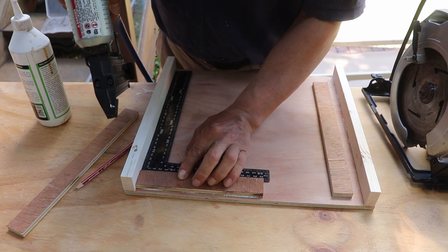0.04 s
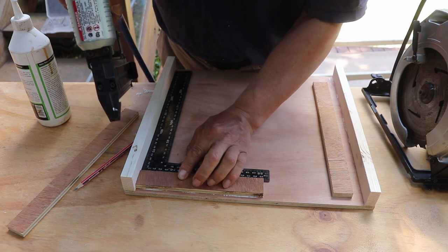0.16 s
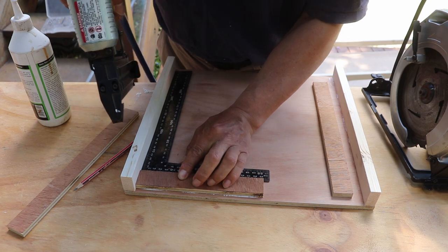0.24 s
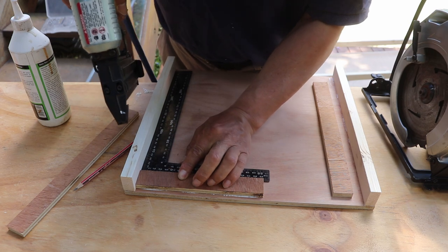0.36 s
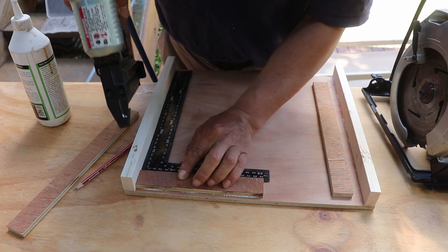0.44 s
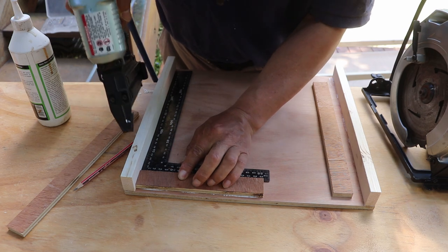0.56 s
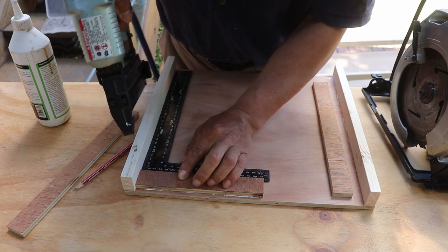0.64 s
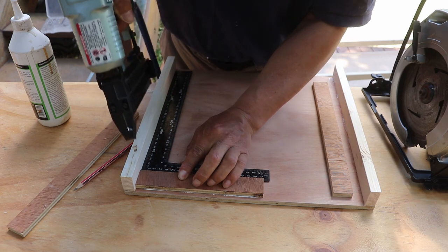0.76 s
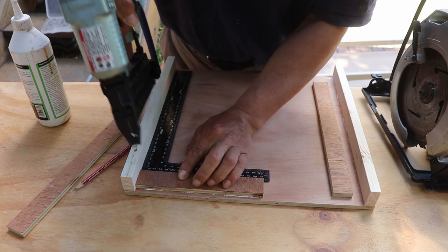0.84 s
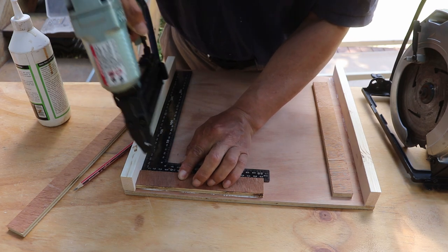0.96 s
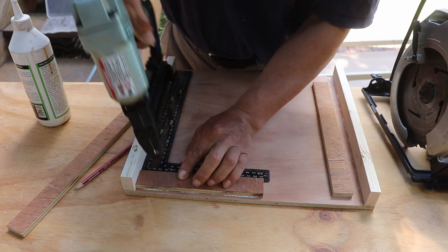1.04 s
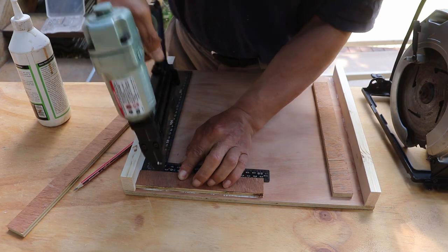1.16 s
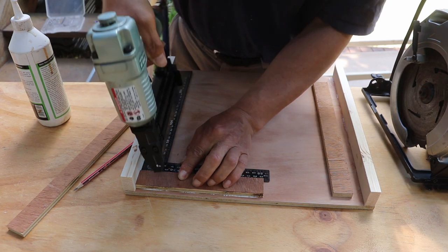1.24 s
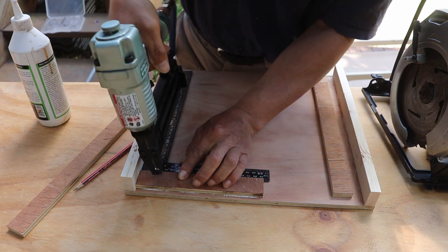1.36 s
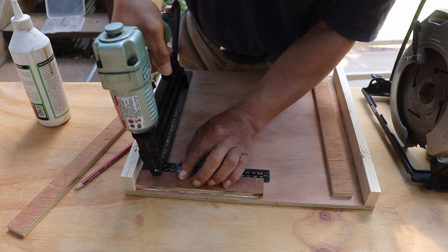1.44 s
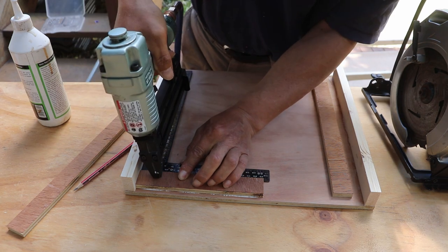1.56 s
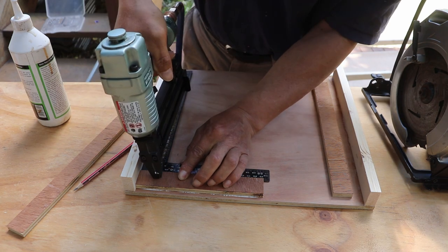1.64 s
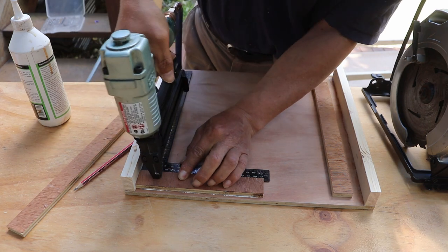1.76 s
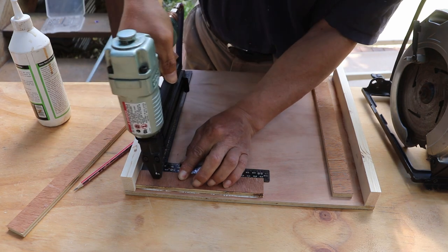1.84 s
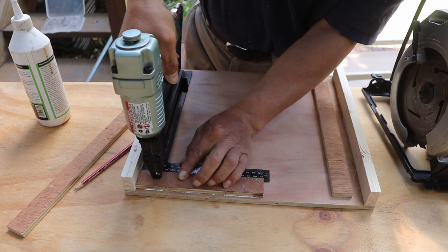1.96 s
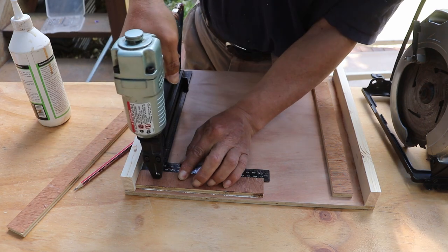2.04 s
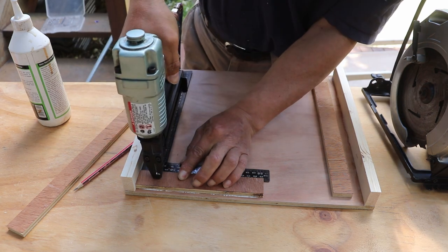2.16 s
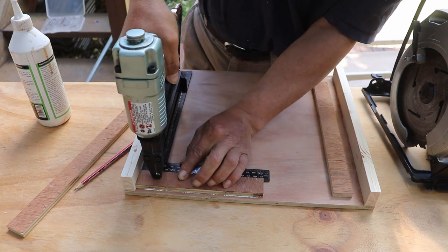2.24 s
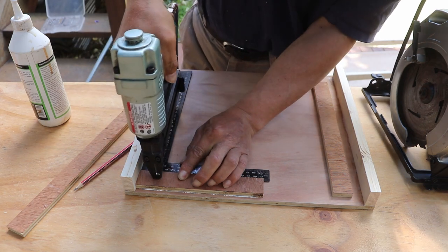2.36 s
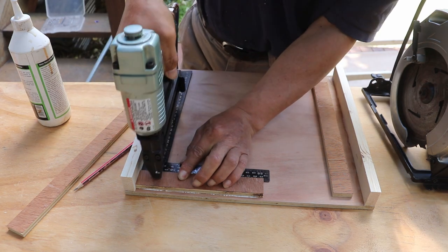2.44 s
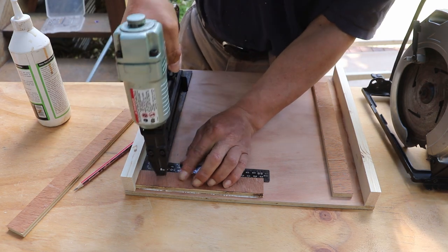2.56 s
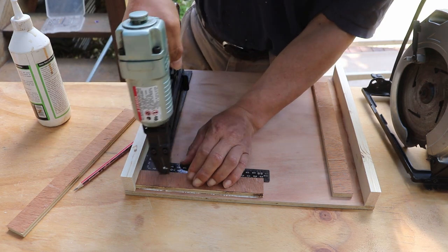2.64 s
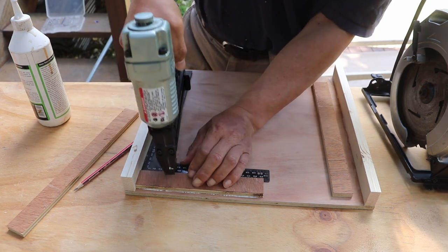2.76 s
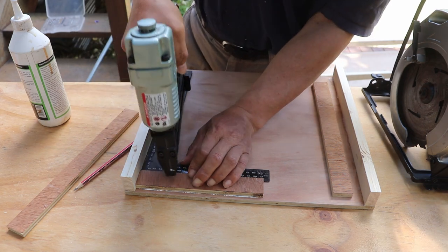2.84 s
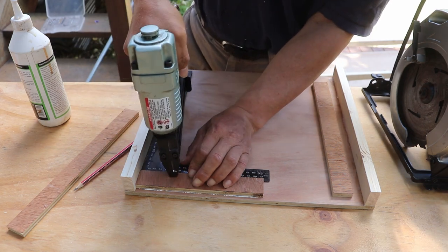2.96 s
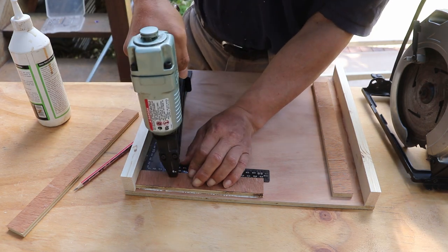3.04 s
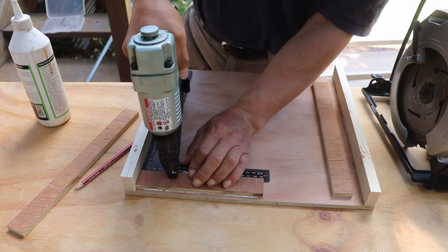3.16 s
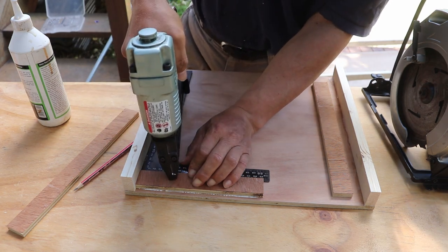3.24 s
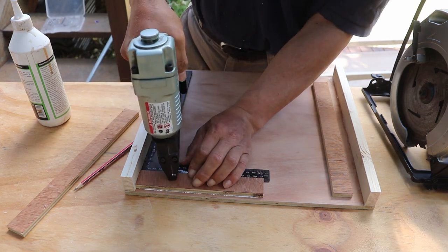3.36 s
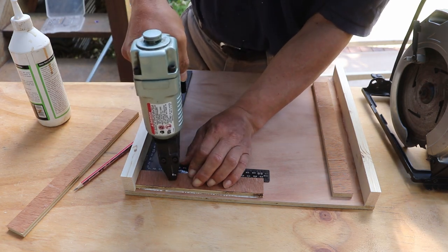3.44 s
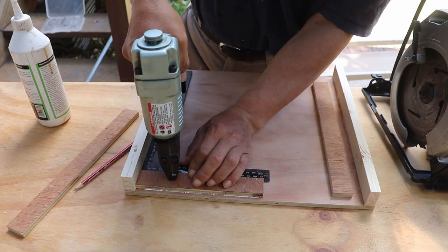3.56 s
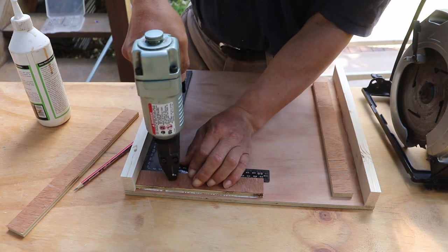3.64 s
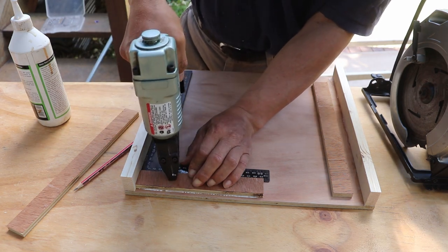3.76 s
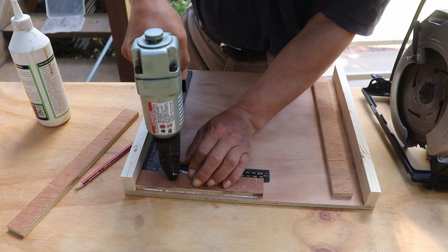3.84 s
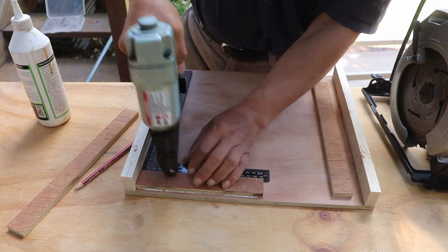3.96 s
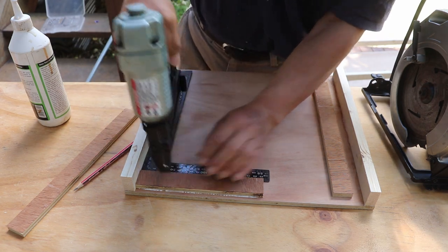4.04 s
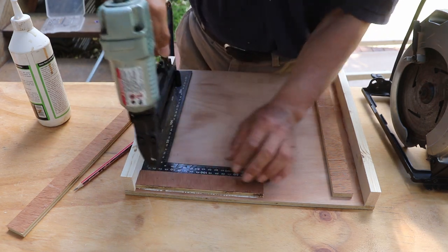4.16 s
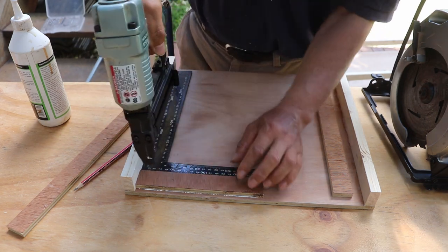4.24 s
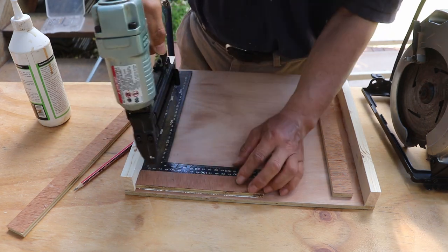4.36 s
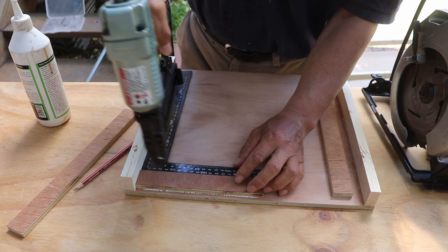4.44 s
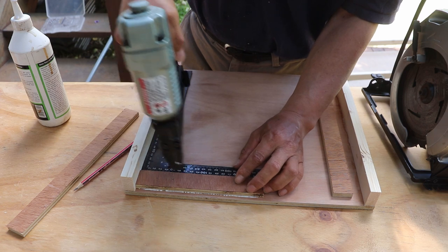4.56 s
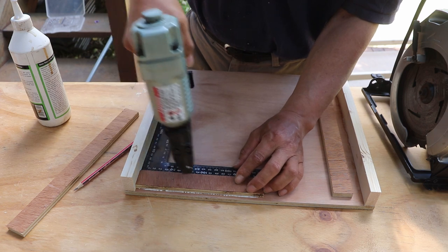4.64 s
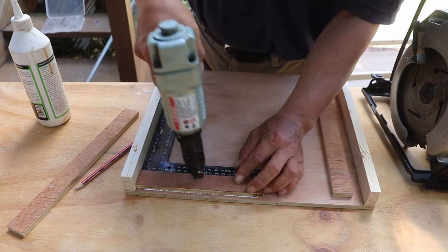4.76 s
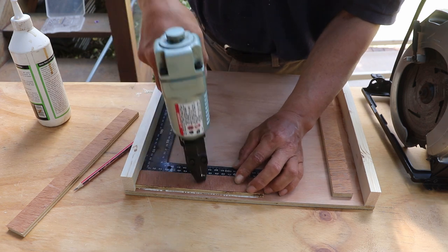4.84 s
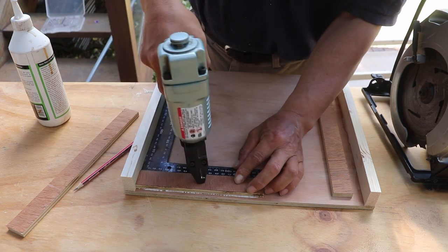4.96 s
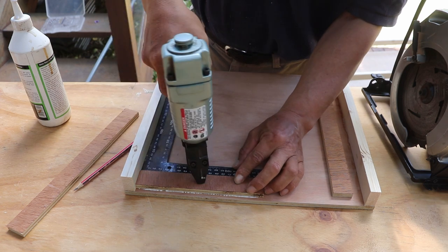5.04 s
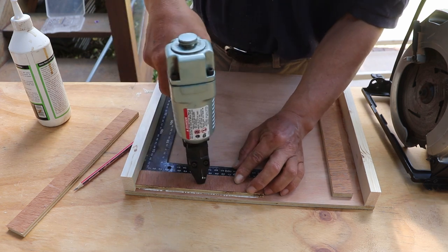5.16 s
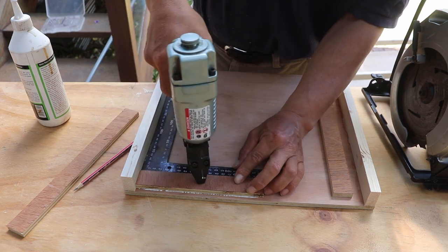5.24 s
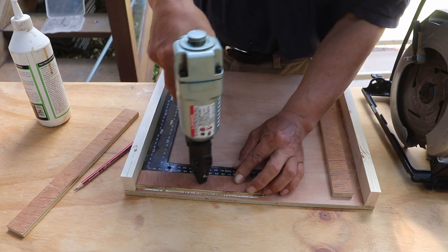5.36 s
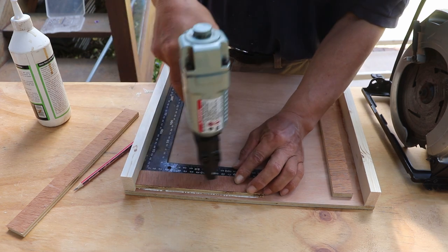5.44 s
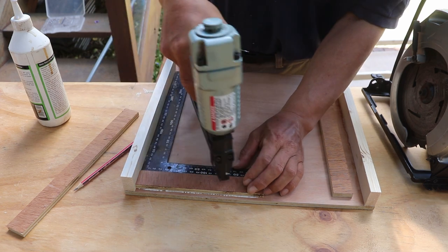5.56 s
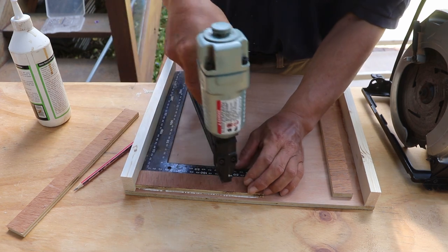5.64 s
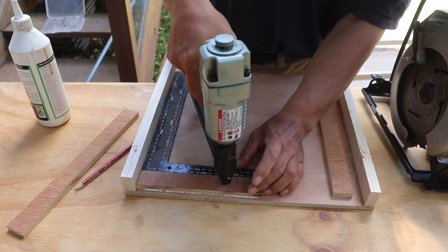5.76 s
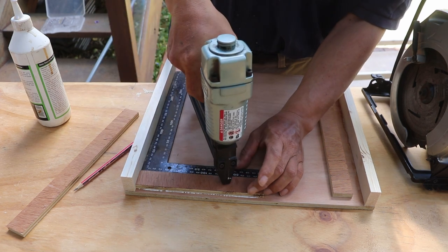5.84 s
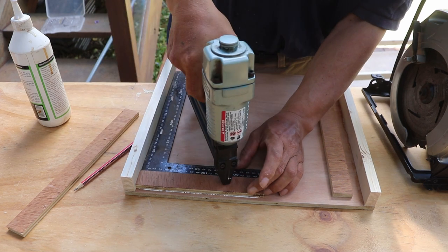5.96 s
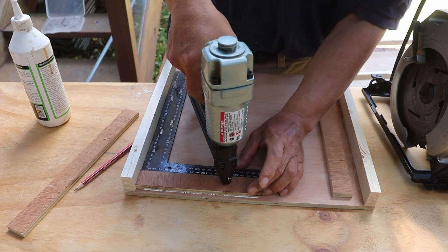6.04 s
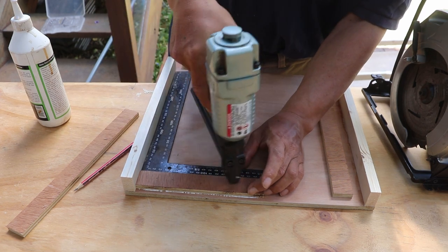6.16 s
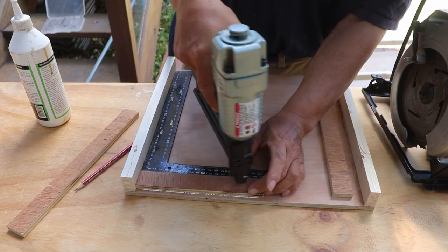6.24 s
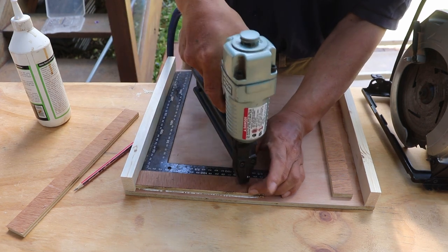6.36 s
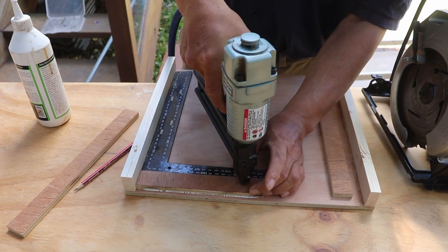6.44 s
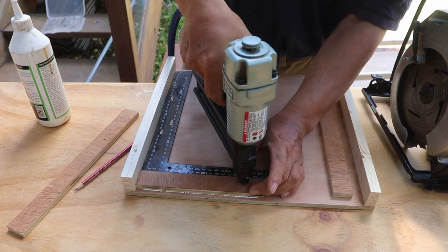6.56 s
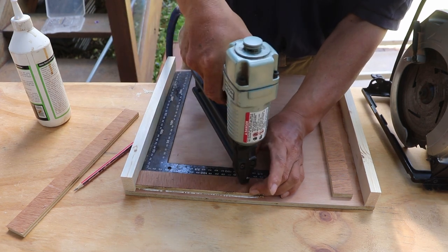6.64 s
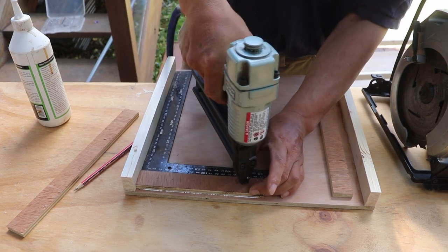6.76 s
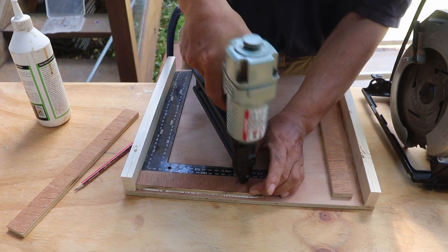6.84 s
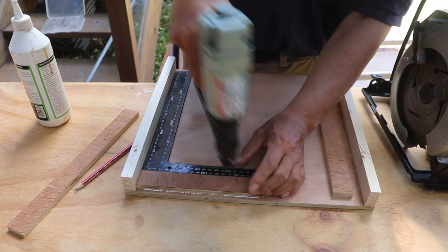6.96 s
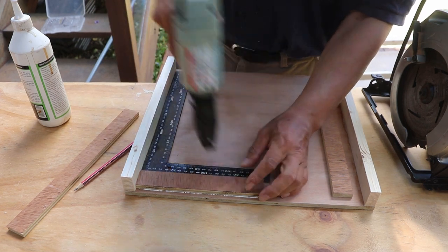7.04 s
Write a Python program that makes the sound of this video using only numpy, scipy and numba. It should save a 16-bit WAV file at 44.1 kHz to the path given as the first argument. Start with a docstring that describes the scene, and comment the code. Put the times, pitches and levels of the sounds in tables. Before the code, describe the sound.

Close stereo pickup at a bench in an open workshop with a short thin echo. Leaky air hissing sits over low rumble. Metallic nose knocks and dull bench thumps precede five very loud nailer shots, two spaced apart, then three quicker ones. Each cracks into wood and vents a sharp air burst about a sixth of a second later. Background ducks and recovers; scraping strokes and hoarse chirps appear between shots.

```python
"""Five shots of an air nailer, pinning a wooden strip to plywood on a bench in an open workshop.
First come a low rumble with a wavering hum (slow noise and two tones) and the hiss of a leaky hose (shaped noise).
The gun is carried over, its nose taps and thumps the work (ringing steel and wood), and a bird calls (hoarse notes).
Each shot is a valve puff, the driver's blow, a leak while the trigger is held, the exhaust and the piston's return.
Between shots, strokes rub over the plywood; the gain control turns everything down after each blast."""
import sys
import numpy as np
from scipy import signal
from scipy.fft import rfft, irfft
from scipy.io import wavfile
from scipy.ndimage import uniform_filter1d, map_coordinates
from numba import njit

SR = 44100
rng = np.random.default_rng(int(sys.argv[2]) if len(sys.argv) > 2 else 0)


def store_wav(level_fs):
    """Save 16-bit WAV to argv[1]."""
    pcm = np.round(np.clip(np.atleast_2d(level_fs), -1, 1) * 32767)
    wavfile.write(sys.argv[1], SR, pcm.T.astype(np.int16))


N = 313110
TIME = np.arange(N) / SR
SHORT = TIME[:SR // 2]  # the first half second, long enough for one event

# All levels in the tables are relative, before the mix, the gain control and any random scatter.
# How alike the two microphones hear a sound: f/Hz, likeness (1 = the same)
LIKENESS = [(25, .65), (80, .95), (140, .97), (260, .96), (600, .68), (1200, .4), (4000, .55), (9000, .35),
            (15000, .3)]
# How sound leans to one side: f/Hz, left minus right level/dB
LEAN = [(100, 1), (500, -0.5), (1000, 0), (2000, -2), (4000, 0), (8500, 0.6), (10500, 2), (12500, 1.5),
        (16000, 8.5)]
# Tone colour of the low outdoor rumble: f/Hz, level/dB
RUMBLE = [(22, -20), (50, -17.5), (76, -0.5), (105, -4), (160, -1.5), (220, -3), (300, 1), (420, -6),
          (700, -7.5), (1000, -16), (1500, -24), (2300, -24), (3000, -24), (4300, -18.5), (5500, -45),
          (8000, -38)]
# Tone colour of the hose hiss with the gun tilted, then upright: f/Hz, level/dB
HOSE_TILTED = [(700, -27), (1700, -19), (3000, -4.5), (3700, -12.5), (4500, -5.5), (5400, -9.5),
               (6500, -4.5), (7300, -2.5), (8300, -2), (9300, -3.5), (11100, 3), (11650, 1.5),
               (13100, -3.5), (14500, -3.5), (15500, -2.5)]
HOSE_UPRIGHT = [(700, -23), (1700, -8.5), (3100, -4.5), (4200, -5), (5400, -8), (6350, -4.5), (7300, -6.5),
                (8200, -4), (9400, -4.5), (11200, 2), (13300, -9.5), (14500, -7), (15500, -7)]
# Loudness of the hose over time: t/s, level/dB
HISS_LEVEL = [(0, -37.5), (.65, -33), (.75, -29), (1.7, -26.5), (2.25, -28.5), (4.8, -28.5), (5.8, -24.5)]
# Whistly resonances of the leaking coupling: f/Hz, level/dB against the hiss
COUPLING = [(6300, -14.5), (8300, -15), (11600, -9.5)]
# Steel nose knocking on the strip: t/s, level/dB, brightness f/Hz
TAPS = [(1.6308, -12.5, 1540), (1.664, -21, 1200), (3.005, -11, 1670), (4.966, -8.5, 1240),
        (5.8365, -5.5, 2090), (5.8628, -4, 980), (6.509, -15.5, 1400), (6.6214, -8, 1000)]
# Light steel clicks of the safety tip as it slides home: t/s, level/dB
CLICKS = [(1.652, -26), (1.676, -22.5), (1.742, -29), (3.044, -22), (3.417, -25), (3.463, -23.5),
          (4.981, -25), (4.990, -23), (5.1, -24)]
# Nose pressed home so that the bench gives: t/s, level/dB, contact time t/s
THUMPS = [(1.790, -9, 0.0048), (3.129, -10.5, 0.0046), (3.331, -4.5, 0.0034), (3.457, -3, 0.0028),
          (5.0904, -8.5, 0.0035), (5.8371, -13, 0.0005), (5.862, 5, 0.0021), (6.621, 3, 0.0027)]
# Resonances of the bench top: f/Hz, level/dB, time to fall 60 dB t/s
BENCH = [(93, -15, 0.23), (129.7, 0, 0.12), (180, 4.5, 0.029), (240, 0, 0.013), (322.7, -4.5, .1),
         (395, -19, 0.11), (540, -14.5, 0.038)]
# Resonances of the nailer body against the strip: f/Hz, level/dB, time to fall 60 dB t/s
GUN_BODY = [(767, -5.5, 0.073), (1033, 1.5, 0.027), (1350, -4, 0.049), (1657, -17.5, 0.058),
            (2347, -8, 0.068), (2720, -0.5, 0.037), (3020, 3.5, 0.046), (3520, 3, 0.065),
            (3883, 4.5, 0.041), (5410, 2, 0.035)]
# Tone colour of steel meeting wood: f/Hz, level/dB
CRACK = [(60, -5.5), (220, -19), (350, 4.5), (560, -5.5), (1000, 1.5), (1500, -1.5), (2200, -0.5),
         (3500, 0.5), (4600, -2.5), (8000, -6), (16000, -13)]
# Bird notes: crest t/s, crest f/Hz, level/dB, rise t/s, fall t/s, pitch droop (share of the pitch)
BIRD = [(1.815, 1987, -43.5, .02, 0.057, .08), (4.27, 3730, -23, .08, 0.089, 0.072),
        (4.44, 3650, -30.5, 0.031, 0.056, 0.11), (4.475, 2870, -35, .025, .05, 0.041),
        (4.564, 2900, -34, 0.048, 0.11, .03), (6.52, 3400, -32, 0.22, .04, .07),
        (6.575, 3890, -26.5, 0.037, .2, 0.16)]
# Shots: valve opens t/s, driver strikes t/s, exhaust opens t/s, puff level/dB,
# time the exhaust takes to open t/s, piston return level/dB
SHOTS = [(2.2714, 2.3100, 2.4645, 1, 0.011, 20.5), (3.6858, 3.716, 3.8836, -0.5, 0.0097, 20.5),
         (5.2148, 5.2445, 5.4055, 8.5, 0.0066, 22), (5.945, 5.9787, 6.1520, 0, 0.013, 22),
         (6.733, 6.767, 6.9178, 6.5, 0.013, 24.5)]
# Tone colours of the valve puff, the trigger leak and the exhaust: f/Hz, level/dB
PUFF = [(100, -8.5), (1000, -13.5), (2200, -8.5), (3200, 4), (4500, -3), (8500, 0), (13500, 2), (16000, -3)]
LEAK = [(300, -5.5), (2000, -9), (3300, -3), (4600, -8), (7000, -1.5), (8700, 2.5), (11000, -4),
        (13300, -2), (16000, -15)]
EXHAUST = [(100, -7.5), (700, -15.5), (2000, -12.5), (5000, -5.5), (7000, -1.5), (12500, 1), (16000, -0.5)]
# Strokes of hand, strip and nose over the plywood: start t/s, length t/s, level/dB, centre f/Hz
STROKES = [(2.714, 0.38, -31.5, 200), (2.93, 0.13, -25.5, 240), (3.208, 0.52, -30, 262),
           (4.152, 0.58, -27, 120), (4.683, 0.415, -26.5, 207), (5.598, 0.31, -40.5, 296),
           (6.355, 0.43, -29, 332)]
# Tone colour of friction on plywood: f/Hz, level/dB
RUB = [(30, -26), (65, -16), (95, -1.5), (190, 1.5), (320, 1.5), (450, -0.5), (750, 0), (1200, -7),
       (2500, -12.5), (6000, -10)]
# Tone colour of the workshop's echo tail: f/Hz, level/dB
ROOM = [(100, 7.5), (500, 4.5), (1500, 2.5), (4000, 1.5), (10000, -3), (13000, -5), (16000, -11)]


def amp(db):
    """Turn decibels into a multiplier."""
    return 10 ** (np.asarray(db) / 20)


def unit(x):
    """Scale a sound to an rms of 1."""
    return x / np.sqrt(np.mean(x ** 2))


def over_hz(points, size):
    """Join (Hz, value) points over the bins of a spectrum."""
    hz, value = np.transpose(points)
    bin_hz = np.arange(size // 2 + 1) * SR / size
    return np.interp(np.log(bin_hz + 1), np.log(hz), value)


def noise(colour, size=N):
    """Coloured noise of rms 1 at two microphones, most alike in the bass."""
    mid, side = rfft(rng.standard_normal((2, size)))
    like = np.clip(over_hz(LIKENESS, size), -1, 1)
    lean_db = over_hz(LEAN, size) / 2
    mid = mid * np.sqrt(1 + like)
    side = side * np.sqrt(1 - like)
    both = np.array([(mid + side) * amp(lean_db), (mid - side) * amp(-lean_db)])
    return unit(irfft(both * amp(over_hz(colour, size)), size))


def walk(rate):
    """Smooth random wandering with a spread near 1; a higher rate wanders faster."""
    k = int(SR / rate)
    steps = np.repeat(rng.standard_normal(N // k + 1), k)
    return unit(uniform_filter1d(uniform_filter1d(steps, k), k)[:N])


def lowpass(x, hz):
    """Take the treble off a sound."""
    return signal.sosfilt(signal.butter(2, min(hz, SR / 3), fs=SR, output="sos"), x)


def fade(t60):
    """A steady dying away by 60 dB in t60 seconds."""
    return np.exp(-np.log(1000) * SHORT / t60)


def swell(t, attack_s, hold_s, t60):
    """Envelope that grows, holds and dies away."""
    grow = np.clip(t / attack_s, 0, 1) ** 2
    return grow * np.exp(-np.log(1000) * np.maximum(t - attack_s - hold_s, 0) / t60)


def add(out, s, x):
    """Mix in a sound starting at s seconds."""
    i = int(s * SR)
    out[:, i:i + x.shape[-1]] += x[..., :N - i]


def outdoors():
    """Low rumble with the wavering hum of a distant motor, a tone and its octave."""
    turn = 2 * np.pi * np.cumsum(77.5 * (1 + 0.0094 * walk(10))) / SR
    hum = amp(-42.5) * np.sin(turn) + amp(-40) * np.sin(2 * turn)
    rumble = noise(RUMBLE) * amp(-33.0 + 0.4 * walk(13))
    return rumble + hum * amp(2.3 * walk(5.85))


def delayed(x, lag_s):
    """Both channels by way of a path whose length changes."""
    return np.array([map_coordinates(side, [(TIME - lag_s) * SR], order=3, mode="mirror") for side in x])


def hoarse(hz, width_hz):
    """A narrow band of noise that follows a pitch, partly shared by the two channels."""
    phase = 2 * np.pi * np.cumsum(hz) / SR
    apart = unit(lowpass(rng.standard_normal((2, len(hz))), width_hz))
    shared = unit(lowpass(rng.standard_normal(len(hz)), width_hz))
    return apart * np.sin(phase) + shared * np.cos(phase)


def hose():
    """Air leaks and whistles at the coupling; its bounce off the bench combs the hiss as the gun moves."""
    # from, to: the gun is carried to the work, then slowly turned upright
    lift_s, upright_s = (0.734, 1.26), (2.8, 5.6)
    carried = np.interp(TIME, lift_s, (0, 1))
    upright = np.interp(TIME, upright_s, (0, 1))
    hiss = np.sqrt(1 - upright) * noise(HOSE_TILTED) + np.sqrt(upright) * noise(HOSE_UPRIGHT)

    rest_lag_s, work_lag_s = 0.00063, 0.00097
    lag_s = rest_lag_s + carried * (work_lag_s - rest_lag_s)
    bench_bounce = delayed(hiss, lag_s * (1 + 0.018 * walk(5.6)))
    # a path three times as long, by way of the worker's body, adds finer ripples
    body_bounce = delayed(hiss, 3 * lag_s * (1 + 0.015 * walk(4)))

    # the whistles start sharp and sink as the gun is carried over
    bend = 1 + 0.12 * (1 - carried) + 0.006 * walk(5)
    whistles = sum(amp(db) * hoarse(hz * bend, width_hz=160) for hz, db in COUPLING)
    whistles = whistles * swell(TIME - lift_s[0], attack_s=0.05, hold_s=1.5, t60=40)

    air = hiss + amp(-21) * bench_bounce + amp(-9) * body_bounce + whistles
    return air * amp(np.interp(TIME, *np.transpose(HISS_LEVEL)) + 0.17 * walk(27))


def ring(modes, scatter):
    """Decaying tones of a struck object, a little different at every spot that is struck."""
    total = 0
    for hz, db, t60 in modes:
        level = amp(db + 2 * rng.standard_normal())
        spot_hz = hz * (1 + scatter * rng.standard_normal())
        total = total + level * fade(t60) * np.sin(2 * np.pi * spot_hz * SHORT)
    return total


def clack(crack_t60, ring_db):
    """Steel meets wood: a crack and the ring of the tool, which each microphone hears from its own side."""
    own_sides = np.array([ring(GUN_BODY, 0.016), ring(GUN_BODY, 0.027)])
    body = ring(GUN_BODY, 0.013) + 0.57 * own_sides
    return noise(CRACK, size=len(SHORT)) * fade(crack_t60) + amp(ring_db) * body


def tap(db, bright_hz):
    """Steel touches the strip; a lower brightness makes the knock duller."""
    return amp(db) * lowpass(1.41 * clack(0.053, -17), bright_hz)


def thump(contact_s):
    """The nose presses and rebounds, flexing the bench top; the air follows its acceleration."""
    push = np.sin(np.pi * np.minimum(SHORT / contact_s, 1)) ** 2
    rebound = np.interp(SHORT - 0.0012, SHORT, push)  # the same push, 1.2 ms later
    flex = signal.fftconvolve(push - 0.53 * rebound, ring(BENCH, 0.039))[:len(SHORT)]
    x = np.gradient(flex)
    return x / np.abs(x).max()


def handling():
    """The nose is set down and pressed on the strip, and its safety tip clicks."""
    out = np.zeros((2, N))
    for s, db, bright_hz in TAPS:
        add(out, s, tap(db, bright_hz))
    for s, db in CLICKS:
        add(out, s, tap(db, bright_hz=5550))
    for s, db, contact_s in THUMPS:
        add(out, s, amp(db) * thump(contact_s))
    return out


def bird():
    """Hoarse arching notes, smeared by many paths on their way in, with an echo off a wall."""
    out = np.zeros((2, N))
    arch_s = 0.041  # the pitch droops over this time on either side of the crest
    hold_s, fade_db = 0.021, 14  # hold after the crest; level lost over one rise or fall time
    t = SHORT - SHORT[-1] / 2  # time from the crest
    for crest_s, crest_hz, db, rise_s, fall_s, droop in BIRD:
        arch = 1 - droop * (1 - np.exp(-(t / arch_s) ** 2))
        hz = crest_hz * arch * (1 + 0.0087 * walk(122.8)[:len(t)])
        before = np.maximum(-t, 0) / rise_s
        after = np.maximum(t - hold_s, 0) / fall_s
        note = hoarse(hz, width_hz=136) + amp(-12) * hoarse(2 * hz, width_hz=170)
        add(out, crest_s + t[0], amp(db - fade_db * (before + after)) * note)
    return out + 0.23 * np.roll(out, int(0.055 * SR), axis=1)


def gust(colour, attack_s, hold_s, t60):
    """A short burst of coloured noise."""
    return noise(colour, size=len(SHORT)) * swell(SHORT, attack_s, hold_s, t60)


def whistle(air, hz, width_hz, db):
    """Air rushing through the valve rings its passage."""
    return air + amp(db) * signal.lfilter(*signal.iirpeak(hz, hz / width_hz, fs=SR), air)


def valve_puff():
    """The valve opens with a puff, and air keeps flowing into the cylinder for a moment."""
    puff = gust(PUFF, attack_s=0.0075, hold_s=0.0004, t60=0.031)
    flow = gust(PUFF, attack_s=0.00069, hold_s=0.042, t60=0.005)
    return whistle(puff + amp(-16) * flow, hz=8450, width_hz=480, db=0.64)


def driver_blow():
    """The force builds while the nail sinks in and ends as the driver bottoms out, shaking tool and bench."""
    strike = gust(CRACK, attack_s=0.00012, hold_s=0.00095, t60=0.022)
    sink = gust(CRACK, attack_s=0.0056, hold_s=0.0019, t60=0.023)
    boards = lowpass(gust(CRACK, attack_s=0.012, hold_s=0.0077, t60=0.1), 2400)  # they rattle on, duller
    drive = amp(-1) * strike + sink + amp(-18.5) * boards
    return amp(18) * (drive + 0.63 * clack(0.0079, -10.0) + amp(-11) * thump(0.0017))


def trigger_leak(held_s):
    """Air leaks while the trigger is held, then closes down to a seep just before the exhaust."""
    left_s = held_s - SHORT
    flow = np.clip((left_s - 0.018) / 0.003, 0, 1) + amp(-11) * (left_s > 0)
    return amp(-15) * flow * whistle(noise(LEAK, size=len(SHORT)), hz=3450, width_hz=450, db=-5)


def exhaust(opening_s):
    """The cylinder empties as fast as the finger lets the valve open; the piston pushes out more air."""
    pressure_s = 0.015  # the pressure gives out this long after the exhaust opens
    vent = gust(EXHAUST, attack_s=opening_s, hold_s=pressure_s - opening_s, t60=0.062)
    drain = gust(EXHAUST, attack_s=0.012, hold_s=0.017, t60=0.049)
    return amp(26) * (vent + amp(-14) * drain)


def piston_return(db):
    """The piston clicks to its stop inside the tool, so the bench adds no bass."""
    no_bass = signal.butter(2, 700, "highpass", fs=SR, output="sos")
    return amp(db) * signal.sosfilt(no_bass, clack(0.0071, -29))


def nailer():
    """Each shot in turn: valve puff, blow, leak under the held trigger, exhaust and piston return."""
    out = np.zeros((2, N))
    for valve_s, blow_s, exhaust_s, puff_db, opening_s, return_db in SHOTS:
        add(out, valve_s, amp(puff_db) * valve_puff())
        add(out, blow_s, driver_blow())
        add(out, blow_s, trigger_leak(exhaust_s - blow_s))
        add(out, exhaust_s, exhaust(opening_s))
        add(out, exhaust_s + 0.038, piston_return(return_db))
    return out


def sliding():
    """Uneven friction drums the plywood, each stroke around its own centre pitch."""
    attack_s = 0.07
    levels = [amp(db) * swell(TIME - s, attack_s, length_s - attack_s, t60=1) for s, length_s, db, _ in STROKES]
    power = np.array(levels) ** 2 + 1e-18
    total_power = power.sum(axis=0)
    centre = np.array(STROKES)[:, 3] @ power / total_power  # the louder stroke sets the pitch
    friction, out = noise(RUB), 0
    for band_hz in 45 * 2 ** np.arange(0, 7, .5):  # half-octave bands, each flickering by itself
        edges = [band_hz / 2 ** .25, band_hz * 2 ** .25]
        band = signal.sosfilt(signal.butter(2, edges, "bandpass", fs=SR, output="sos"), friction)
        near = 1 / np.sqrt(1 + (band_hz / centre - centre / band_hz) ** 2)
        out = out + np.roll(band, rng.integers(SR), axis=1) * near * amp(1.7 * walk(22))
    return unit(out) * np.sqrt(total_power) * amp(0.82 * walk(30))


def workshop(x, t60, wet_db):
    """A short thin tail from the roof and posts."""
    tail = noise(ROOM, size=len(SHORT)) * fade(t60) * np.minimum(SHORT / 0.0014, 1)
    echo = signal.fftconvolve(x, unit(tail) / np.sqrt(len(SHORT)), axes=1)[:, :N]
    return x + amp(wet_db) * echo


def scene():
    """All sources together; only the tool and its handling pass through the workshop's echo."""
    tool = workshop(handling() + nailer(), t60=0.3, wet_db=-21.5)
    return outdoors() + hose() + tool + bird() + sliding()


@njit
def ducking(excess, attack, hold, release):
    """Gain reduction in dB: follows any excess quickly, waits, then lets go at a steady rate."""
    out, cut, wait = np.zeros(len(excess)), 0., 0.
    for i in range(len(excess)):
        wait -= 1
        if excess[i] > cut:
            cut, wait = cut + attack * (excess[i] - cut), hold
        elif wait < 0:
            cut = max(cut - release, 0.)
        out[i] = cut
    return out


def gain_control(x, limit_db, attack_s, hold_s, release_db_per_s):
    """Both channels are turned down together when their power passes the limit."""
    power = signal.lfilter([1 / 32], [1, 1 / 32 - 1], np.mean(x ** 2, axis=0))  # smoothed over about 32 samples
    excess = 10 * np.log10(power + 1e-12) - limit_db
    attack = 1 - np.exp(-1 / (attack_s * SR))
    return x * amp(-ducking(excess, attack, hold_s * SR, release_db_per_s / SR))


def record(dry):
    """The camera ducks the blasts, rounds off what still overshoots and cuts the top."""
    x = gain_control(dry, limit_db=-4.0, attack_s=0.0013, hold_s=0.062, release_db_per_s=105.5)
    x = x / (1 + x ** 6) ** (1 / 6)
    return signal.sosfilt(signal.ellip(10, .2, 70, 15850, fs=SR, output="sos"), x)


dry = scene()
out = record(dry)
store_wav(out)
```